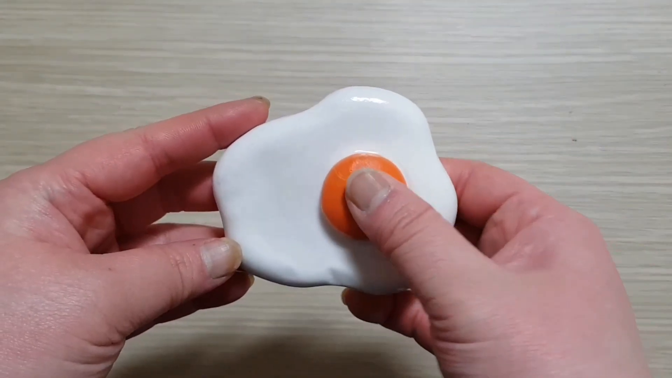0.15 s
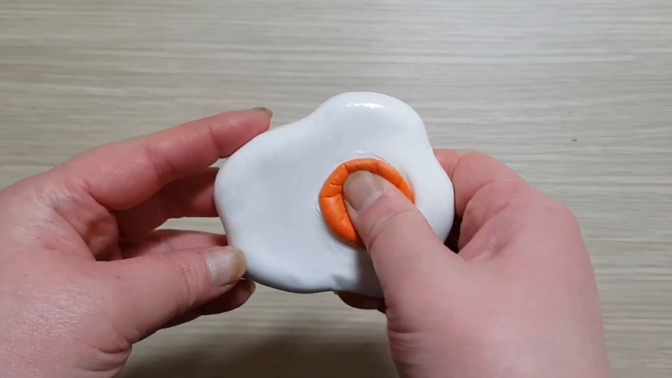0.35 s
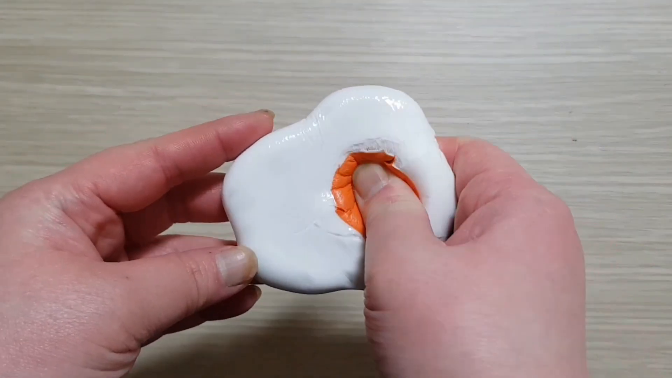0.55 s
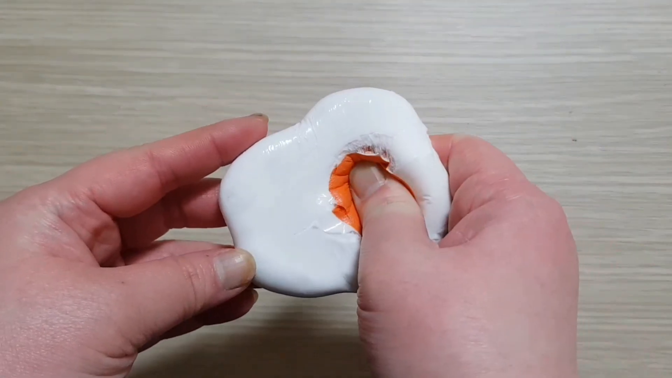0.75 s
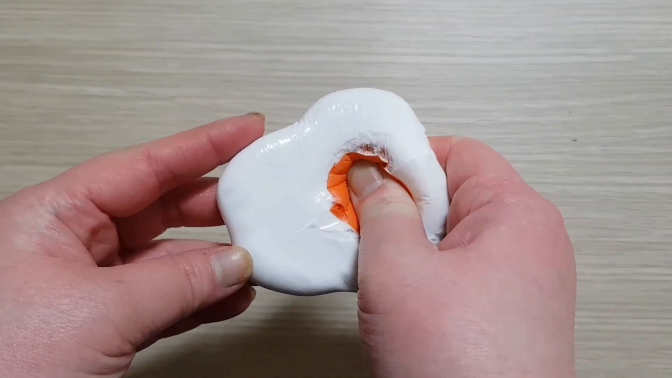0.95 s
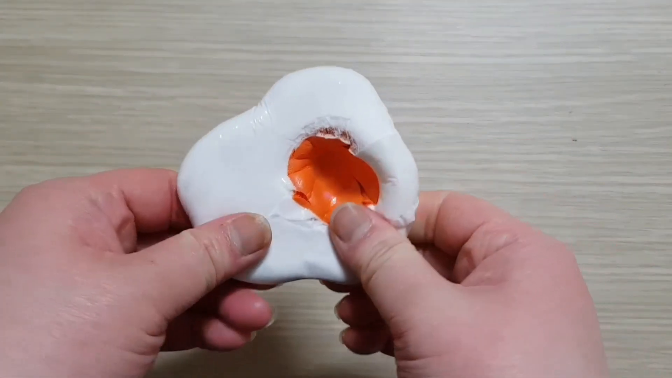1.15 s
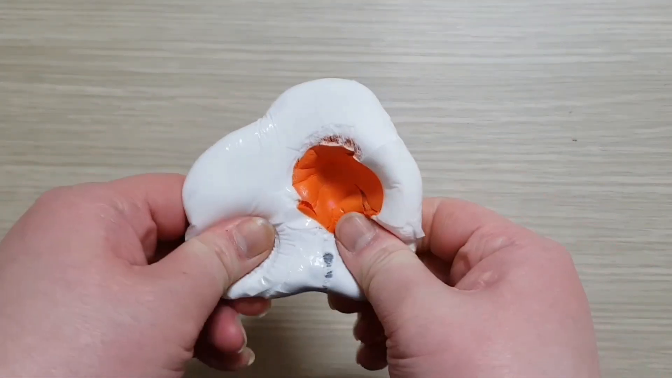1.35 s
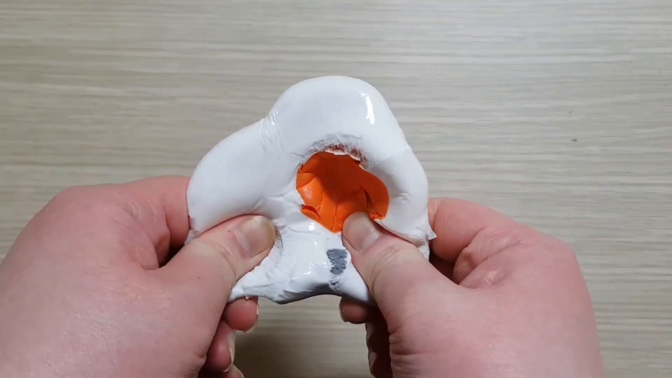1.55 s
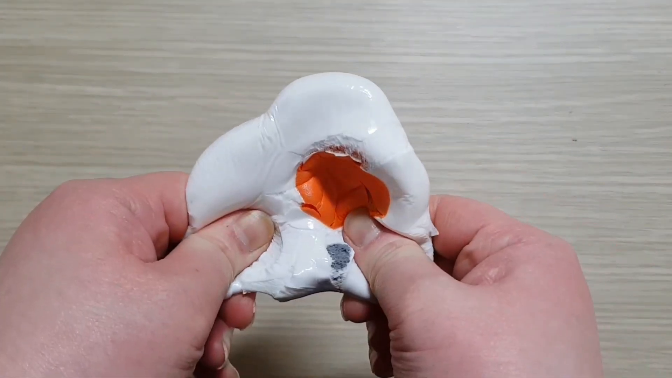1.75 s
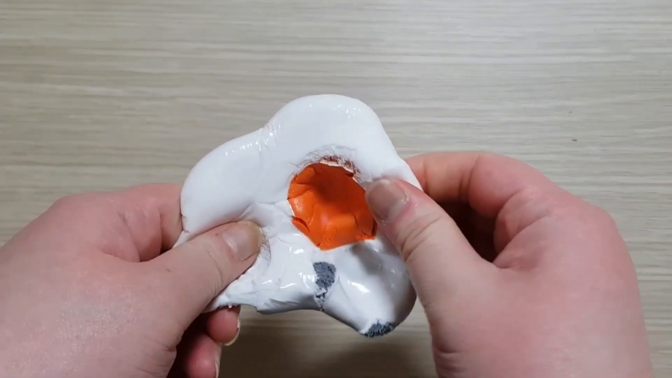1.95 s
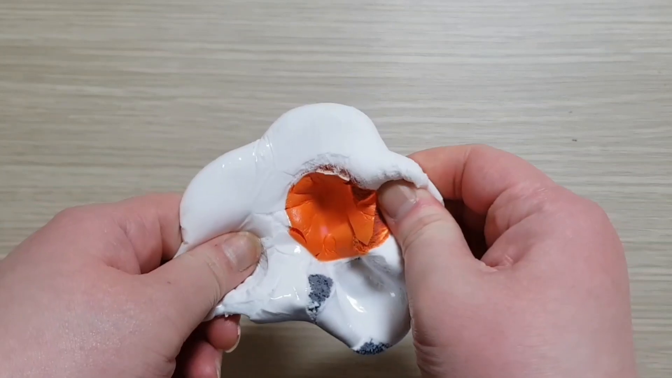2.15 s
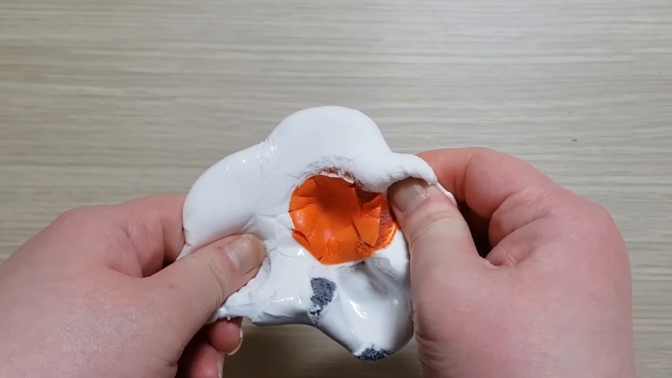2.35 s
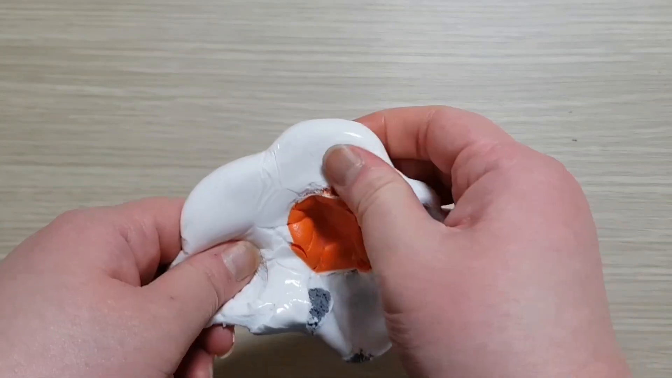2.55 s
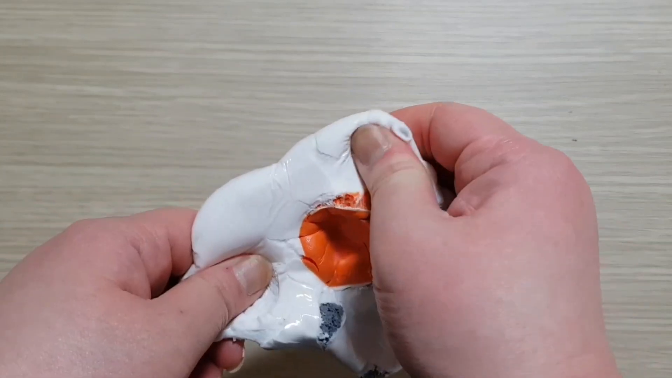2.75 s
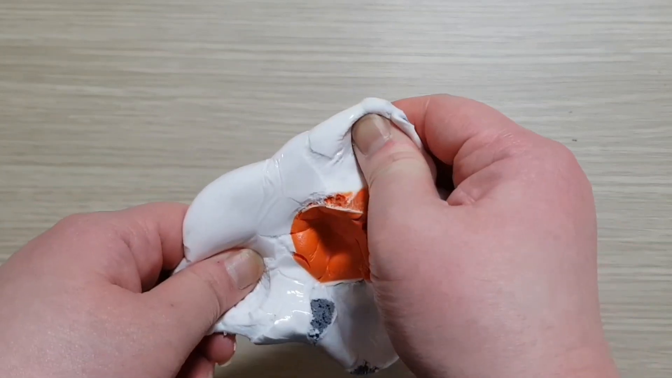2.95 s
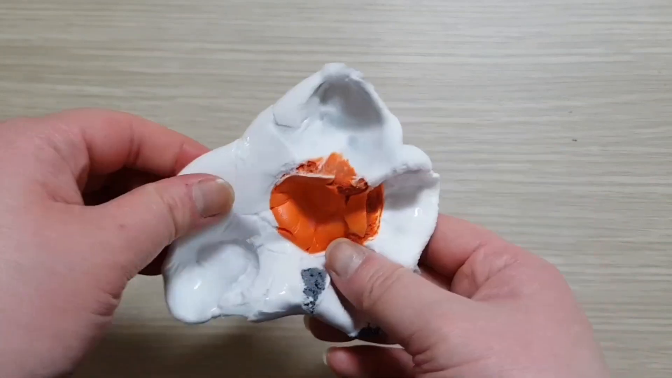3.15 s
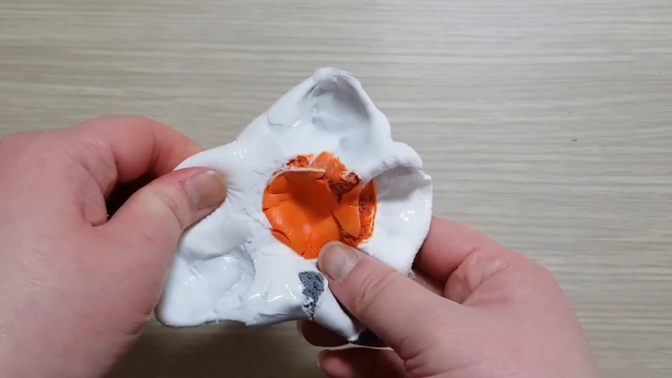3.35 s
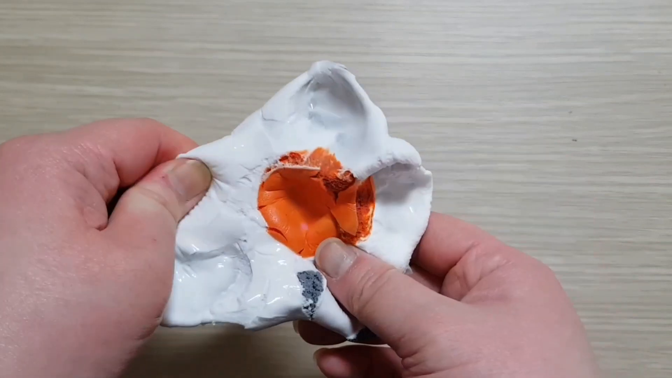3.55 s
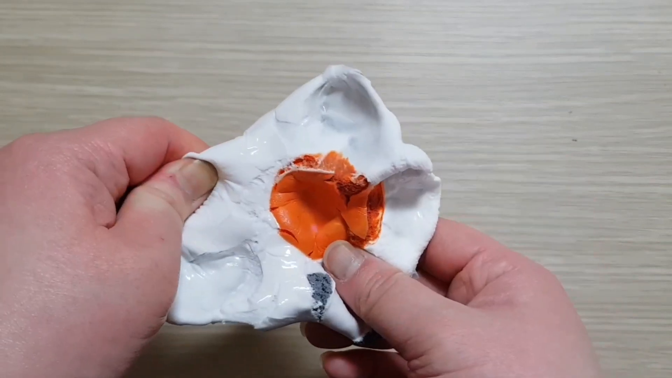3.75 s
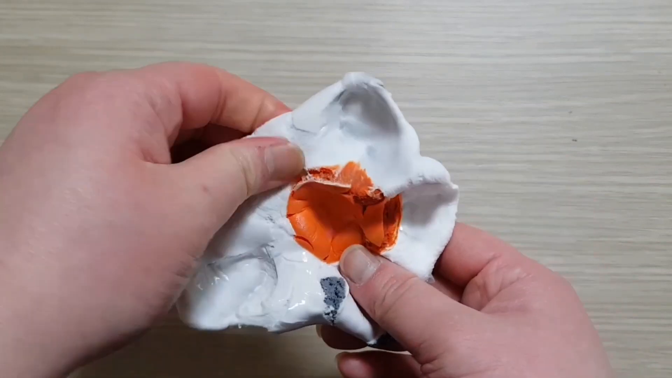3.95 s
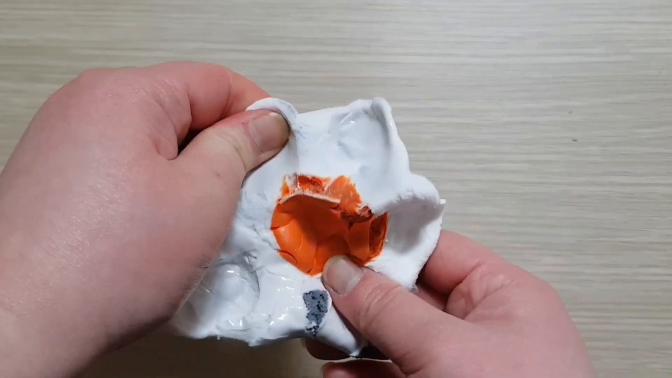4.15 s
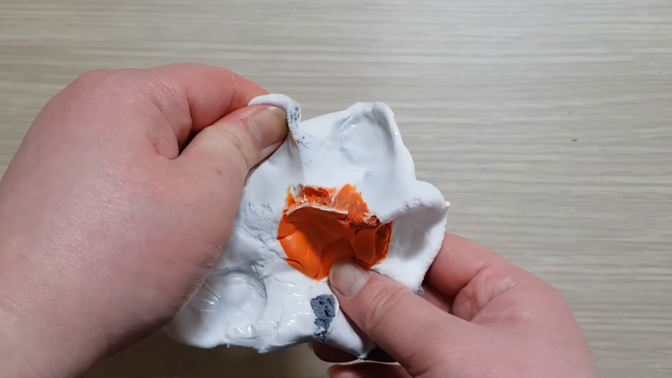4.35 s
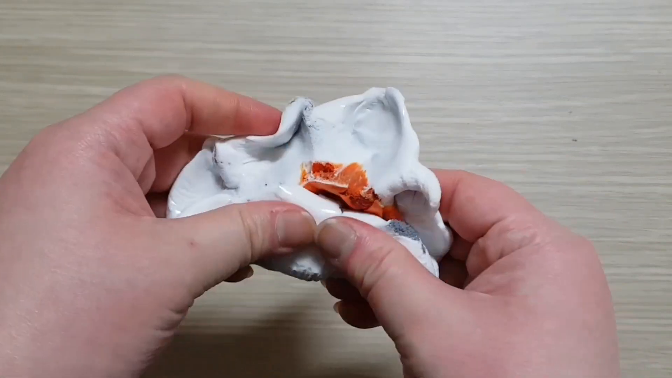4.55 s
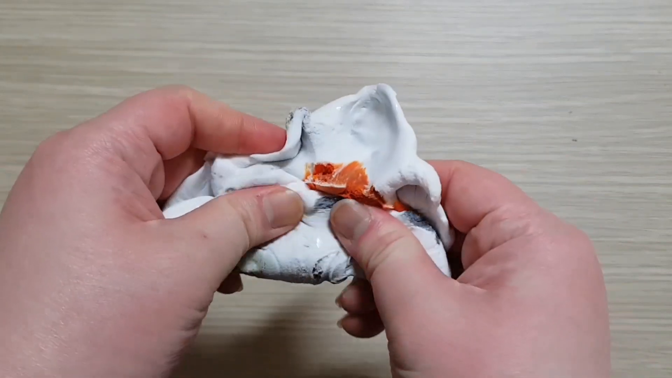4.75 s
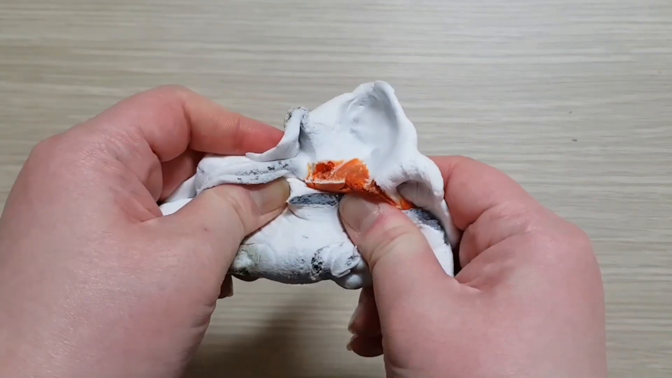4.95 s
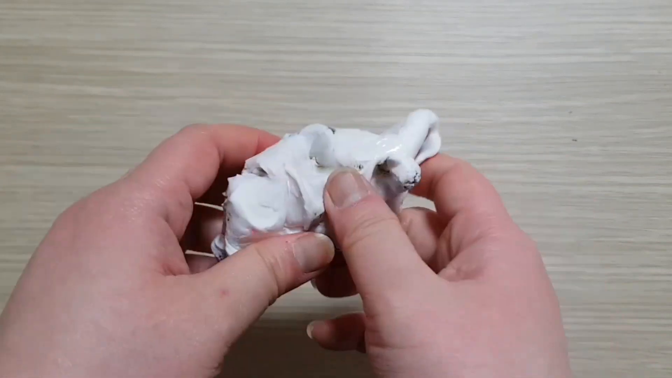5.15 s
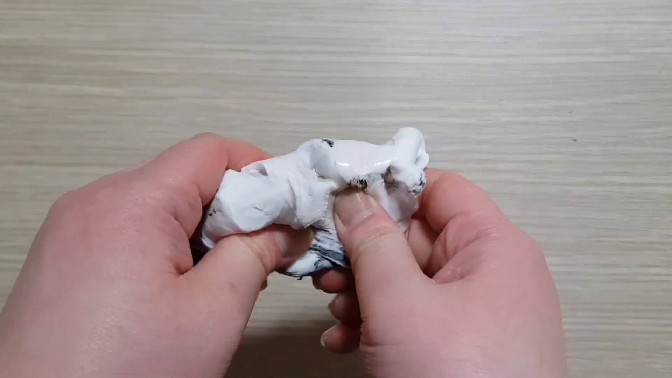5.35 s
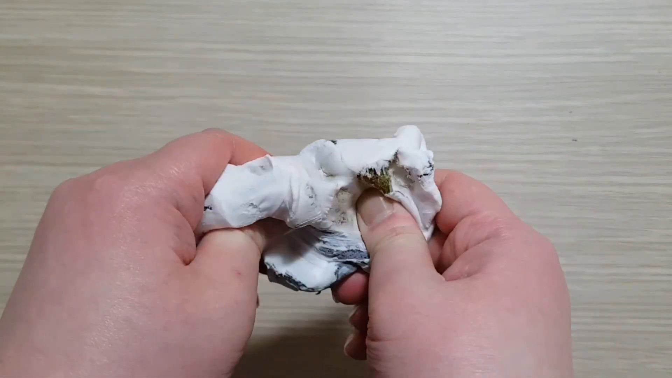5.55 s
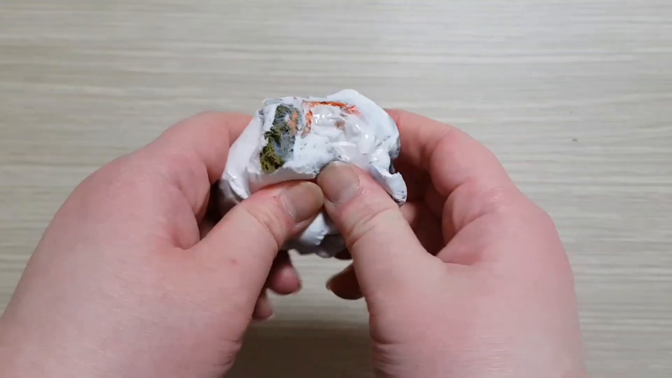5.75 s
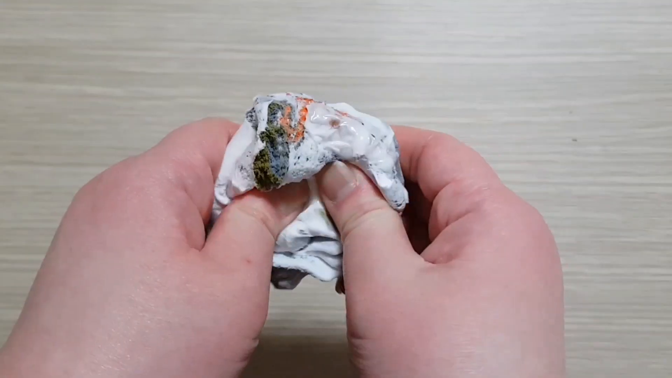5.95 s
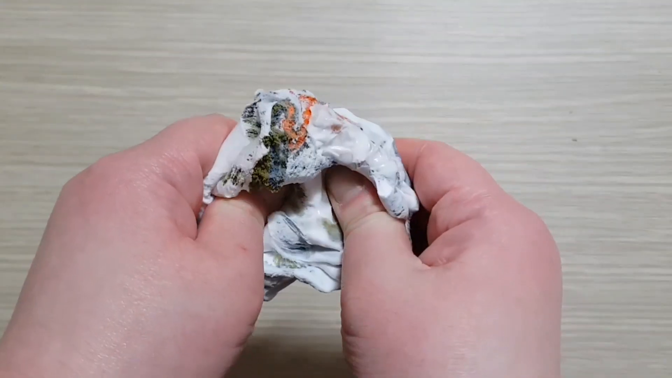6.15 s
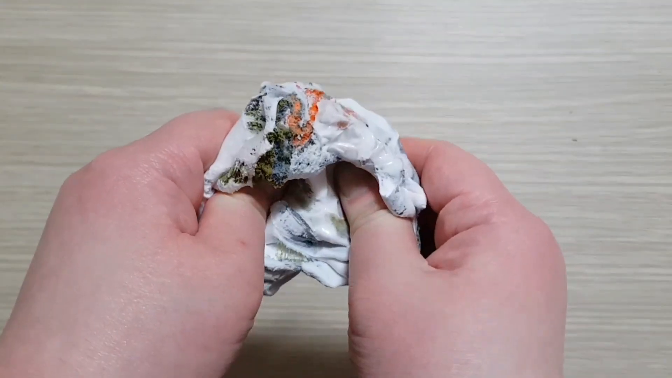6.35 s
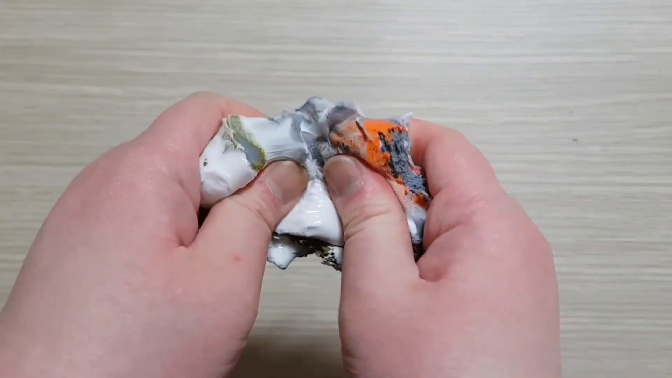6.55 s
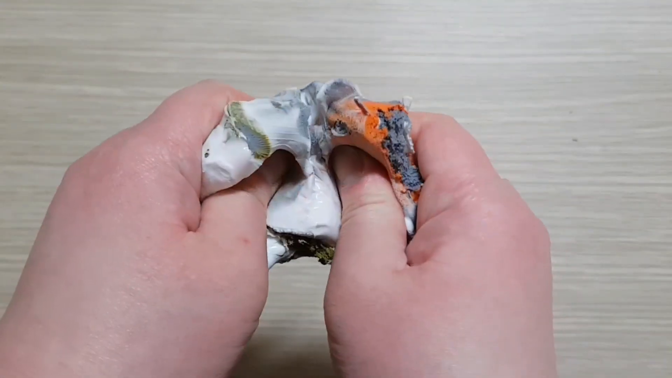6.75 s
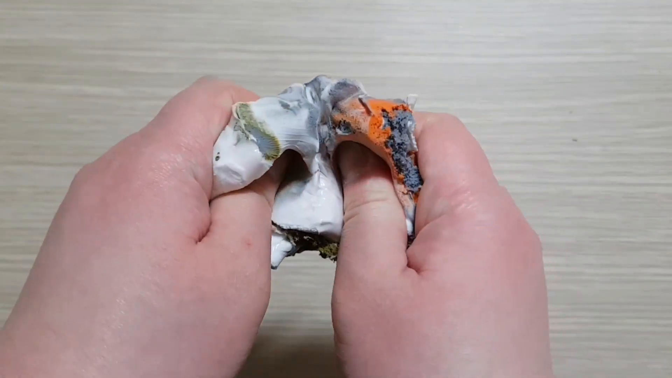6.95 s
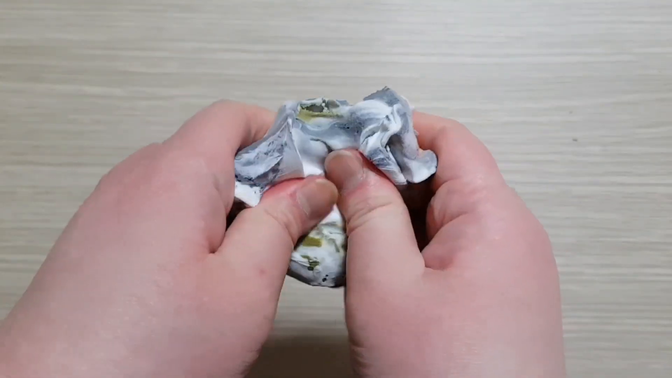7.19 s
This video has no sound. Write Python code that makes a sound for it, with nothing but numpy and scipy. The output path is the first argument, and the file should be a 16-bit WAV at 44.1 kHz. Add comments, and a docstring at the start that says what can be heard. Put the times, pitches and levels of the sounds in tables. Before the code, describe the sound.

Very close to the microphone in a small room, two hands crush a clay piece with a brittle shell and soft filling. After half a second of near silence, dense loud cracks burst out, sharp enough to distort. More crunchy bursts follow in separate squeezes, trailing tiny crumb ticks and a brief room ring. Later crackles are thinner and lighter, over faint hiss and a soft low hum.

```python
"""Crushing a filled clay shell

Two hands crush a hard clay shell with a soft filling, close to a microphone in a small room.
Each squeeze sets off a burst of cracks: short, ragged noise coloured by the shell, with small splits between.
They shed fine crumbs, bounce off the table and ring in the room. Stronger cracks tear longer.
The loudest overload the microphone. Rumble and hiss lie beneath, with a low hum that comes and goes."""
import sys
import numpy as np
from scipy import signal
from scipy.fft import rfft, irfft
from scipy.io import wavfile
from scipy.ndimage import uniform_filter1d

SR = 44100
rng = np.random.default_rng(int(sys.argv[2]) if len(sys.argv) > 2 else 0)


def wav_out(sig):
    """Save sig, one row per channel (or a flat mono array), as 16-bit PCM at SR to the path in sys.argv[1]."""
    wavfile.write(sys.argv[1], SR, np.round(np.clip(np.atleast_2d(sig).T, -1, 1) * 32767).astype(np.int16))


N = 318402

# the cracks that stand out, before trims: start_s, level_db (2.2-7.5 kHz over 1 ms),
# thump_db, body_db, edge_db (these three relative to level_db), ring_hz (ring of the piece)
CRACKS = [(0.5522, -6.5, -19.5, -5, -1.5, 2820), (0.56, -13, -17, -3, -1, 6170),
          (0.624, -0.5, -26.5, -3, -7.5, 3660), (0.6507, -9, -19.5, 6.5, 0.5, 2980),
          (0.6728, -5, -20, -8, -3, 4370), (0.6827, -21, -21, -12, 5, 6750),
          (0.7116, -10, -16, -10, 3, 6240), (0.7332, -3, -19.5, -5, -18, 3060),
          (0.743, -5, -20, -9.5, -5, 3520), (0.7566, -9.5, -33.5, -6, -4, 3400),
          (0.7743, -8.0, -22.5, -15, 2, 5800), (0.7936, -18.5, -29, -13, -5, 3730),
          (0.8307, -6.5, -20, -14, 0.5, 3200), (0.9025, -33, -21, 3, 2, 3990),
          (0.9111, -9, -23, -4.5, -8, 3100), (0.9699, -24, -35.5, -22, 8, 6360),
          (0.9878, -24.5, -30, -20, -1.5, 7000), (1.3757, -47.5, -19, -10, 6.5, 3150),
          (1.4145, -41, -17.5, -14, 10.5, 6550), (1.442, -10.5, -13.5, -6, 8.5, 2720),
          (1.4618, -7, -18.5, -6, -0.5, 2660), (1.4893, -7, -9, -0.5, 2, 3040),
          (1.505, -3.5, -15, -2, -4.5, 2360), (1.5308, -4, -18, -9, -4, 2980),
          (1.5448, -0.5, -24, -5.5, -9, 2860), (1.55, -5.5, -15, -2.5, -10, 2960),
          (1.5709, -6.5, -16, -7.5, -4, 5260), (1.5914, -8.5, -16.5, -5, 0, 2780),
          (1.6107, -16.5, -23.5, -4, 8.5, 3000), (1.6157, -17.5, -11, -23, 4, 4300),
          (1.6896, -29, -21, -4, -17, 2670), (1.773, -25.5, -24.5, -19, -16, 3020),
          (1.8667, -13.5, -38.5, -12.5, -4.5, 5240), (2.1625, -22.5, -27, -15.5, -2.5, 5950),
          (2.1684, -22, -22.5, -9, 5, 2400), (2.2074, -14.5, -28.5, -6.5, 2, 2830),
          (2.224, -20, -21.5, -2, 9.5, 5330), (2.2654, -12.5, -15, -10, 4.5, 6050),
          (2.2714, -10, -35, -8, 0, 7000), (2.2907, -10.5, -31, -12, 2, 4530),
          (2.3316, -18.5, -40, -18, 4.5, 6750), (2.3709, -20.5, -23, -6, 11, 4250),
          (2.3816, -15, -26.5, -17, 6, 4600), (2.4633, -11.5, -17.5, -15.5, 2.5, 3493),
          (2.8086, -21, -16, -4, 0.5, 6630), (2.8461, -4, -17, -0.5, 0.5, 4160),
          (2.8695, -1, -26, -8.5, -3, 3300), (2.8962, -5, -16.5, -5.5, -4, 3150),
          (2.9481, -8, -14.5, -3.5, 3, 4800), (2.954, -14.5, -22, -25, -8, 4610),
          (3.0789, -1.5, -33, -17, -2, 4630), (3.4193, -30.5, -29.5, -1.5, -7.5, 3420),
          (3.457, -15.5, -30, -8, -5.5, 3635), (3.507, -3, -13.5, -7, -5, 2700),
          (3.5671, -4.5, -14.5, -4.5, -4.5, 3000), (3.7735, -5, -12.5, -6, 1, 6200),
          (3.8557, -13, -29, -5, -5, 3860), (4.1723, -42.5, -28.5, -17.5, 1, 6820),
          (4.1902, -32, -24.5, -25, 10.5, 7000), (4.1986, -9.5, -35.5, -14, -7, 6050),
          (4.2355, -10, -23.5, -18, -4.5, 6400), (4.239, -16.5, -34, -6, 0, 6550),
          (4.3032, -15, -27, -15, 1.5, 6400), (4.3422, -11.5, -22.5, -6, 3, 2520),
          (4.4303, -3.5, -32, -25, -8.5, 6410), (4.6969, -33.5, -32, -14.5, 1.5, 2450),
          (4.708, -22.5, -21, -13, -11, 5000), (4.7641, -23, -52, -12, -15, 5600),
          (4.7936, -26, -37, -14, -18, 3390), (4.8168, -15.5, -48, -18, 0, 4610),
          (4.8379, -8.5, -24.5, -8, -3.5, 3040), (4.873, -19, -11.5, -0.5, -4, 3300),
          (4.8766, -8, -8, -2.5, 2, 3300), (4.9217, -18.5, -23, -5.5, 5.5, 2400),
          (4.9794, -14, -27, -10, -0.5, 5530), (4.996, -14.5, -38, -6.5, -2.5, 5660),
          (5.0839, -24.5, -42, 0.5, 3.5, 3230), (5.0971, -15.5, -44, -20, -4, 5020),
          (5.1992, -23.5, -39, -18, 1.5, 6230), (5.2067, -22.5, -29, -16, -2, 6050),
          (5.2346, -43, -26, -11, 3, 5330), (5.2584, -24, -25, -3.5, -3, 5140),
          (5.266, -21.5, -38, -10, -2, 3060), (5.337, -28, -43, -12.5, 2, 4600),
          (5.469, -18, -28, -7, 3.5, 5360), (5.5095, -26, -30, -14, -13, 6510),
          (5.5338, -26.5, -36.5, -5, 3, 6750), (5.5723, -10, -42, -11, -3.5, 4340),
          (5.593, -22, -22, 2, 0, 2440), (5.6418, -5.5, -37, -18, -16, 4940),
          (5.6662, -19.5, -38, -6, -7, 3240), (5.671, -17.5, -48, -6.5, 1, 3100),
          (5.7569, -30.5, -34, -5, 4.5, 3180), (5.7893, -19.5, -48, -11.5, -1.5, 6600),
          (5.9464, -21, -38.5, -20.5, -6, 6300), (6.048, -23.5, -37, -13, -6, 6510),
          (6.1124, -22.0, -41.5, -25, 7.5, 4780), (6.1219, -15.5, -41, -17, 0, 5750),
          (6.1561, -21.5, -38, -10, -12, 4370), (6.1661, -19.5, -29, -8, 9.5, 4236),
          (6.1766, -8, -19.5, -10, -1, 6760), (6.209, -9.5, -26.5, -12, 3, 6240),
          (6.2158, -13, -23, -7.5, 4, 5630), (6.257, -5, -32, -35, -6, 3900),
          (6.2635, -14, -26, -7, 8.5, 4500), (6.281, -8.5, -31, -1, -4, 3040),
          (6.3664, -19.5, -39, -13, 0, 3460), (6.373, -26.5, -31, 1, 7, 3270),
          (6.4569, -36.5, -21.5, -0.5, -2.5, 3280), (6.468, -24, -32.5, -7.5, -1.5, 3070),
          (6.6125, -39, -27.5, -11.5, -1, 6880), (6.7123, -21.5, -29.5, -2.5, -7.5, 6650),
          (6.7534, -15, -37.5, -12, -9.5, 2760), (6.7999, -12, -30.5, -5, -7.5, 3850),
          (6.8169, -21, -27, 3, 0.5, 3710), (6.8429, -15.5, -27.5, -9.5, -22, 2630),
          (6.9197, -14, -43, -15, -6.5, 5800), (6.9689, -26, -42, -16, -2, 6240),
          (7.0181, -31.5, -38, -20, 4.5, 4524), (7.1102, -41.5, -32, -29, 8, 6800)]
# thump, body, middle and edge of a crack: from_hz, to_hz
BAND_EDGES_HZ = [(150, 850), (1000, 2200), (2200, 7500), (8000, 16000)]
# colour of the snapping shell: pitch_hz, flat_db (as a flat plate), caved_db (once caved in)
SHELL = [(29.95, -18, -32.5), (190, -16.5, -25.5), (443.5, -12, -20.5), (765, -13.5, -19), (1017, -3.5, -8),
         (1130, -5, -5.5), (1543, 3.5, 6.5), (1826, 0.5, 1), (2920, 0, -3.5), (4730, 0.5, 0), (7000, 2, -1),
         (8220, -8.5, -6.5), (11600, 0, -1), (15830, -1.5, -0.5)]
# the room's answer: pitch_hz, level_db, t60_s (time to die away by 60 dB)
ROOM = [(102, -7, 0.11), (494.7, 3, 0.23), (1630, -5.5, 0.29), (2130, 2, 0.25), (5600, -4.5, 0.32),
        (8300, -2, 0.35), (10700, -1, 0.28), (15500, -4, 0.23)]
# moments at which the ringing breaks off short: start_s
BREAKS = [1.928, 3.301, 3.968, 5.217, 5.859]
# tone colour of the rumble and hiss: pitch_hz, level_db (per Hz, relative)
FLOOR = [(20, -21.5), (45, -6), (70, -4), (140, -9), (400, -16), (1200, -22), (4000, -26.5), (8500, -33.5),
         (12500, -22.5), (16000, -28.5)]
# how loud the low hum is, before it flutters: start_s, level_db
HUM = [(4.3, -82), (4.9, -60.5), (5.35, -64.5), (5.8, -63), (6.0, -58), (6.48, -55), (6.62, -74),
       (6.85, -69.5), (7.2, -63)]
# the shell gradually loses its low ring between these times: start_s, end_s
CAVING_IN = (2.1, 3.37)
# one row a squeeze of the hands: start_s, end_s, length_ms (of its tears, before scaling),
# room_db (share sent to the room), split_db (level of the small splits)
SQUEEZES = [(0.546, 0.987, 0.53, -4.5, -21.5), (1.449, 1.618, 0.58, -3, -15), (1.68, 1.873, .4, -4.5, -42),
            (2.163, 2.4, 0.46, -6, -20.5), (2.842, 2.966, 0.78, -4, -16.5), (3.07, 3.1, 1.16, -2, -27.5),
            (3.404, 3.568, 0.39, -7, -33), (3.774, 3.838, 0.48, -5, -17.5), (4.167, 4.43, 0.42, -5.5, -32),
            (4.723, 4.94, 0.43, -4, -26.5), (4.964, 5.13, 0.457, -0.5, -20),
            (5.435, 5.805, 0.53, -4.5, -28), (5.866, 6.048, 0.48, -1.5, -42),
            (6.082, 6.38, 0.38, -5.5, -24), (6.712, 6.98, 0.55, -2.5, -26)]

FLOOR_DB, FLOOR_START_S = -62, .375
HUM_HZ = 48.7  # the pitch it wavers around
ONSET_SAMPLES = 6  # moves a snap later, to make room for its rounded start
EDGE_HZ = 16150  # the treble ends around here
DOUBLE_TEAR_DB = 27.5  # a crack this much stronger tears twice as long
# an ordinary crack: its level, then its thump, body and edge relative to that
USUAL_DB = -12
USUAL_THUMP_DB, USUAL_BODY_DB, USUAL_EDGE_DB = -29, -8, -1
USUAL_RING_HZ = 4300
ROOM_BY_STRENGTH = 0.0085  # dB of room share gained for each dB of strength
# the room gathers all directions, so a piece's ring stands out less there
ROOM_RING_DB = 4.0


def gain_of(db):
    """Turns decibels into a plain multiplier."""
    return 10 ** (np.asarray(db) / 20)


def evened(x):
    """Scales to an average strength (rms) of 1."""
    return x / np.sqrt(np.mean(x ** 2, axis=-1, keepdims=True) + 1e-20)


def read(points, hz, axis=1):
    """Reads one column of a table, joined by straight lines over log frequency."""
    points = np.array(points, float)
    return np.interp(np.log(hz + 1), np.log(points[:, 0] + 1), points[:, axis])


def rfft_hz(size):
    """Frequencies of the bins of a spectrum."""
    return np.arange(size // 2 + 1) * SR / size


def add(mix, s, sound):
    """Lays a stereo sound into the mix at time s."""
    part = mix[:, max(round(s * SR), 0):][:, :sound.shape[1]]
    part += sound[:, :part.shape[1]]


def causal(gain):
    """Gives a magnitude the timing of a real object, which rings only after it is struck."""
    cepstrum = irfft(np.log(gain + 1e-6))
    half = len(cepstrum) // 2
    # fold the half before time zero onto the half after it
    cepstrum[1:half] *= 2
    cepstrum[half + 1:] = 0
    return np.exp(rfft(cepstrum))


def background(alike=0.47, waver=0.018, flutter_db=1.6, rumble_db=-1.5):
    """Room rumble and microphone hiss, with a hum that wavers and swells over a rough low drone."""
    t, hz = np.arange(N) / SR, rfft_hz(N)
    left, other = rfft(rng.standard_normal((2, N)))
    # the two channels share more in the bass than in the treble
    same = np.clip(alike / (1 + hz / 3000), 0, 1)
    noise = np.array([left, same * left + np.sqrt(1 - same ** 2) * other])
    floor = gain_of(FLOOR_DB) * evened(irfft(noise * gain_of(read(FLOOR, hz)), N))

    wander = uniform_filter1d(rng.standard_normal((2, N)), size=6000, axis=1)
    drift, flutter = evened(wander)
    hum_db = np.interp(t, *np.transpose(HUM))
    hum_phase = 2 * np.pi * np.cumsum(HUM_HZ * (1 + waver * drift)) / SR
    hum = gain_of(hum_db + flutter_db * flutter) * np.sqrt(2) * np.sin(hum_phase)

    # noise in a hump just above the hum's pitch
    drone_shape = np.exp(-2 * np.log2((hz + 1) / (1.1 * HUM_HZ)) ** 2)
    drone = evened(irfft(noise * drone_shape, N))
    # in dB, the drone swells only half as much as the hum
    drone *= gain_of(rumble_db + (hum_db + FLOOR_DB) / 2 - 4.5)
    return (floor + hum + drone) * np.clip((t - FLOOR_START_S) / 0.007, 0, 1)


def squeeze_at(s):
    """Finds the squeeze of the hands nearest to time s."""
    return min(SQUEEZES, key=lambda row: max(row[0] - s, s - row[1]))


def splits(per_s=26, spread_db=3.0, ends_db=-8.0, colour_db=2.5, ring_octaves=0.34, count=24):
    """Small cracks at random moments of each squeeze, tending strongest mid-way; rows as in CRACKS."""
    rows, usual = [], np.array([USUAL_THUMP_DB, USUAL_BODY_DB, USUAL_EDGE_DB])
    for start, end, _, _, split_db in SQUEEZES:
        # one random moment in each equal slice of time
        moments = start + (np.arange(count) + rng.random(count)) / per_s
        for s, chance in zip(moments, rng.standard_normal((count, 5))):
            if s < end:
                # 0 in the middle of the squeeze, 1 at both ends
                slack = (2 * (s - start) / (end - start) - 1) ** 2
                level_db = split_db + ends_db * slack + spread_db * chance[0]
                ring_hz = USUAL_RING_HZ * 2 ** (ring_octaves * chance[1])
                rows.append((s, level_db, *(usual + colour_db * chance[2:]), ring_hz))
    return rows


def shard(band_db, ring_hz, s, size=1024, ring_db=8.0, ring_octaves=0.19, count=9):
    """Spectrum of a piece breaking at time s: shell colour, its own ring, and a set energy in each band."""
    hz, caved = rfft_hz(size), np.interp(s, CAVING_IN, (0, 1))
    shell_db = (1 - caved) * read(SHELL, hz) + caved * read(SHELL, hz, axis=2)
    octaves_away = np.log2((hz + 1) / ring_hz)
    colour = gain_of(shell_db + ring_db * np.exp(-.5 * (octaves_away / ring_octaves) ** 2))
    # energy of each bin, as a level over 1 ms
    power = colour ** 2 * 2 / size / (SR / 1000)
    lift_db = []
    for db, (lo, hi) in zip(band_db, BAND_EDGES_HZ):
        band_power = power[(hz > lo) & (hz < hi)].sum()
        lift_db.append(db - 10 * np.log10(band_power))
    # join the bands and blend the steps over count bins
    lift_db = np.interp(hz, np.ravel(BAND_EDGES_HZ), np.repeat(lift_db, 2))
    return causal(colour * gain_of(uniform_filter1d(lift_db, size=count)))


def snap(piece, length_ms, size=1024, tear=.54, swell=0.62, first_break=.22, apart_hz=7640.0,
         lag_s=.00007, pan_db=3.0, bounce=0.47, bounce_s=0.0015):
    """A ragged tear swells and lets go with a sudden break, stronger if short; the table echoes it."""
    t, hz = np.arange(size) / SR, rfft_hz(size)
    tear_s = np.clip(tear * length_ms, .08, 4) / 1000
    rip = rng.standard_normal((2, size)) * (t / tear_s) ** swell * np.exp(-t / tear_s)
    first, second = rfft(rip / np.linalg.norm(rip, axis=1, keepdims=True))
    # a single click, tear_s after the start
    sudden = first_break / max(length_ms, .1) * np.exp(-2j * np.pi * hz * tear_s)
    first = first + rng.choice([-1, 1]) * sudden
    second = second + 1j * rng.choice([-1, 1]) * sudden

    # the right channel hears it a little later, and its treble differs more
    same = 1 / np.sqrt(1 + (hz / apart_hz) ** 2)
    lag = lag_s * abs(1 + .6 * rng.standard_normal())
    right = (same * first + np.sqrt(1 - same ** 2) * second) * np.exp(-2j * np.pi * hz * lag)
    tearing = np.array([first, right])
    echo_s = bounce_s * rng.uniform(.8, 1.9, (2, 1))
    tearing *= 1 + bounce * np.exp(-2j * np.pi * hz * echo_s)

    # make the tear even over broad bands: the colour comes from the piece
    broad = np.sqrt(uniform_filter1d(abs(tearing) ** 2, size=48, axis=1) + 1e-9)
    tearing /= np.array([causal(channel) for channel in broad])
    top = np.clip((SR / 2 - hz) / (SR / 2 - EDGE_HZ), 0, 1)
    sound = np.roll(irfft(tearing * piece * top), ONSET_SAMPLES)
    dying = np.clip(2 - 4 * t / t[-1], 0, 1)  # silent in the second half
    return sound * dying * gain_of(pan_db * rng.standard_normal() * np.array([[.5], [-.5]]))


def cracks(level_db=0.5, thump_db=-1.5, body_db=0., edge_db=-0.5, left_db=0.77, send_db=0., room_by_body=.15):
    """Breaks the shell: what reaches the microphone directly, and what goes out into the room."""
    direct, sent = np.zeros((2, 2, N))
    trim = level_db + np.array([thump_db, body_db, 0, edge_db])
    for s, db, thump, body, edge, ring_hz in list(CRACKS) + splits():
        _, _, length_ms, room_db, _ = squeeze_at(s)
        stronger = db - USUAL_DB
        band_db = db + trim + np.array([thump, body, 0, edge])
        scaled_ms = length_ms * 2 ** (stronger / DOUBLE_TEAR_DB)
        add(direct, s, snap(shard(band_db, ring_hz, s), scaled_ms))
        # broad pieces, with much body, send more into the room
        share_db = send_db + room_db + ROOM_BY_STRENGTH * stronger + room_by_body * (body - USUAL_BODY_DB)
        room_piece = shard(band_db + share_db, ring_hz, s, ring_db=ROOM_RING_DB, count=15)
        add(sent, s, np.tile(irfft(room_piece), (2, 1)))
    return direct * gain_of([[left_db], [-left_db]]), sent


def crumbs(sent, per_s=130, settle_s=.024, spread_db=3.0, level_db=-8.5, count=12):
    """Tiny splinters snap for a while after each crack, as strong as the recent breaking."""
    age = np.arange(5000) / (settle_s * SR)
    recent = np.sqrt(age) * np.exp(-2 * age)
    energy = (sent ** 2).mean(0)
    strain = np.sqrt(abs(signal.oaconvolve(energy, recent / recent.sum())[:N]))
    sizes = gain_of(spread_db * np.minimum(rng.exponential(1, N), 3))
    clicks = strain * evened(sizes * (rng.random(N) < per_s / SR))
    # each click becomes one of a few kinds of tick, with rings from low to high
    kind, out = rng.integers(0, count, N), np.zeros((2, N))
    for k, ring_hz in enumerate(np.geomspace(2200, 7000, count)):
        tick = snap(shard([-30.5, -10, 6.0, 4.5], ring_hz, np.mean(CAVING_IN)), 0.43)
        tick = tick / np.linalg.norm(tick[0])
        out += signal.oaconvolve((clicks * (kind == k))[None], tick, axes=1)[:, :N]
    # the crumbs fall silent briefly after each break in the ringing
    for s in BREAKS:
        out[:, round(s * SR):][:, :len(recent) // 2] = 0
    return gain_of(level_db) * out


def room_tail(size=26460, delay_s=0.00051, build_s=0.0026):
    """Dense reflections of random sign and strength; each band dies at its own speed."""
    t = np.arange(size) / SR
    taps = rng.standard_normal((2, size)) * (rng.random((2, size)) < .15)
    hz, frame_s, bands = signal.stft(evened(taps), SR, nperseg=256)
    t60_s = np.maximum(read(ROOM, hz, axis=2), .05)[:, None]
    decay = np.log(1000) / t60_s
    # the last factor keeps a band's total energy the same, however slowly it dies
    bands *= gain_of(read(ROOM, hz))[:, None] * np.exp(-decay * frame_s) * np.sqrt(2 * decay / SR)
    tail = signal.istft(bands, SR, nperseg=256)[1][:, :size]
    return tail * (1 - np.exp(-np.maximum(t - delay_s, 0) / build_s))


def room(sent, level_db=0., fade_s=0.011, count=3):
    """Rings on until each break; sets of random reflections take turns steadily, so the ringing varies."""
    t, out = np.arange(N) / SR, np.zeros((2, N))
    tails = [room_tail() for _ in range(count)]
    path = (np.arange(N) // 700) % count  # the next set every 700 samples
    starts, ends = [0] + list(BREAKS), list(BREAKS) + [N / SR + fade_s]
    for start, end in zip(starts, ends):
        span = (t >= start) & (t < end)
        ring = sum(signal.oaconvolve((sent * (path == k))[:, span], tails[k], axes=1) for k in range(count))
        fade = np.clip((end - t[span]) / fade_s, 0, 1) ** 2
        out[:, span] = ring[:, :span.sum()] * fade
    return gain_of(level_db) * out


def scene():
    """Mixes cracks and crumbs, their room, and the background."""
    direct, sent = cracks()
    splinters = crumbs(sent)
    return direct + splinters + room(sent + .5 * splinters) + background()


def record(dry, ceiling=0.96, overload_db=-11.0, thud_hz=295.0):
    """The loudest snaps flatten against the ceiling, lopsidedly, leaving a low thud; treble is cut off."""
    clipped = dry / (1 + (dry / ceiling) ** 6) ** (1 / 6)
    low_pass = signal.butter(2, thud_hz, fs=SR, output="sos")
    # the thud is the low part of what the ceiling cut away
    thud = signal.sosfilt(low_pass, abs(dry - clipped))
    heard = clipped - gain_of(overload_db) * thud
    band_limit = signal.firwin(255, EDGE_HZ, window=("kaiser", 7), fs=SR)
    return signal.oaconvolve(heard, band_limit[None], "same")


dry = scene()
out = record(dry)
wav_out(out)
```